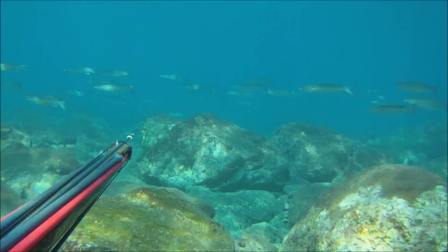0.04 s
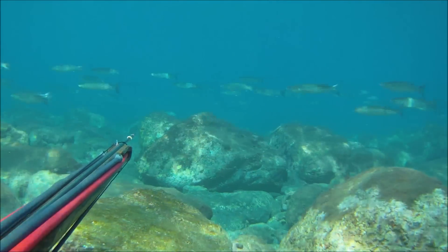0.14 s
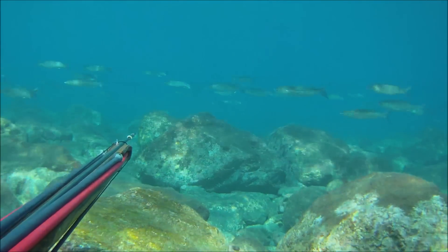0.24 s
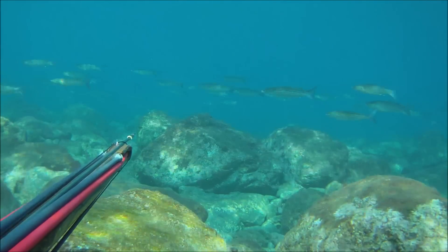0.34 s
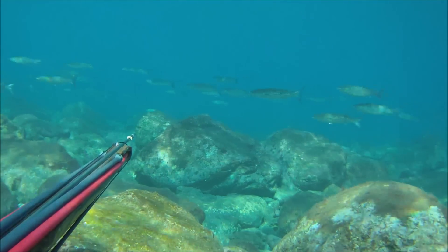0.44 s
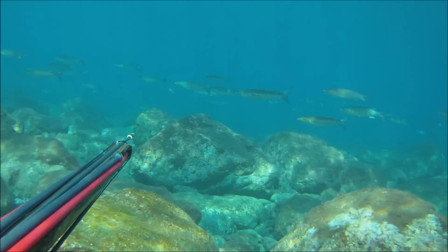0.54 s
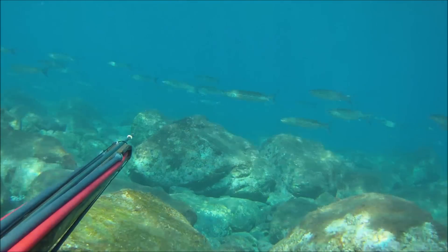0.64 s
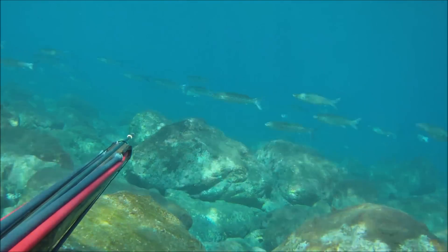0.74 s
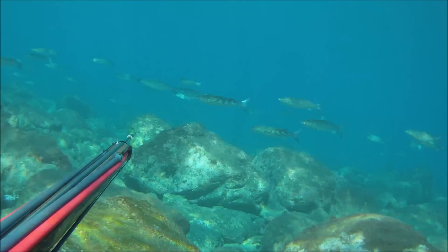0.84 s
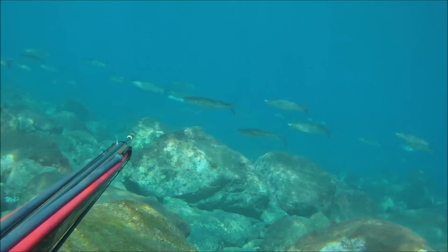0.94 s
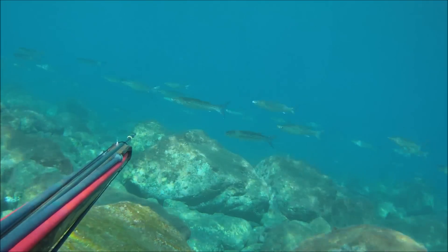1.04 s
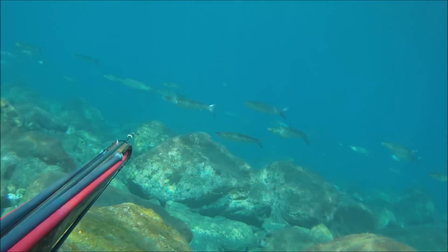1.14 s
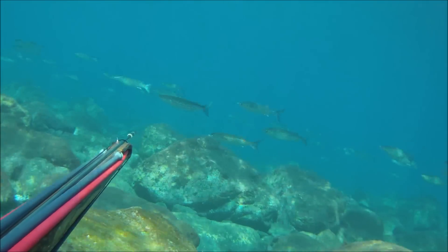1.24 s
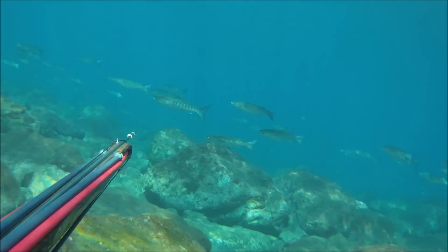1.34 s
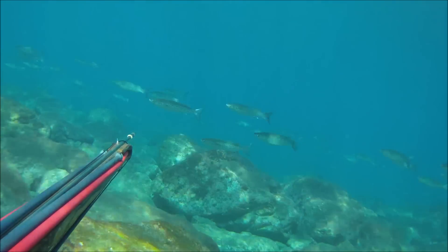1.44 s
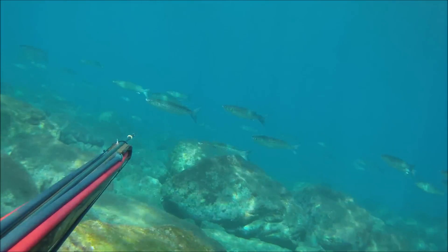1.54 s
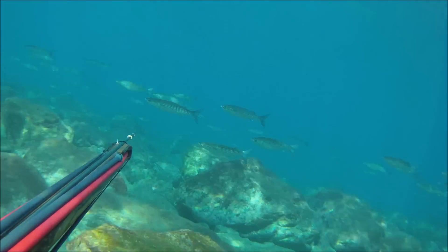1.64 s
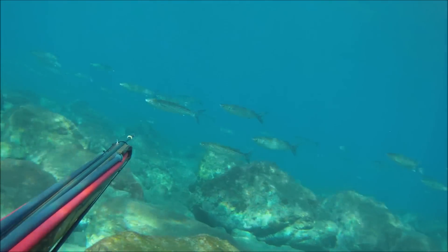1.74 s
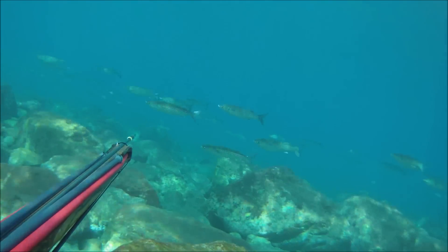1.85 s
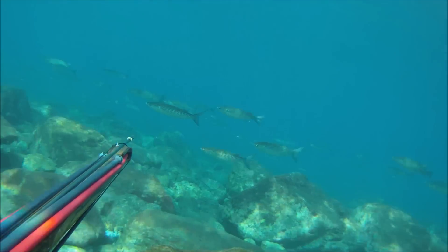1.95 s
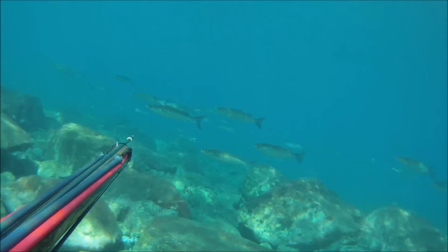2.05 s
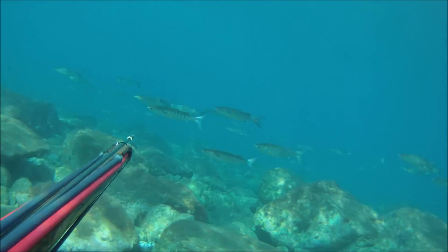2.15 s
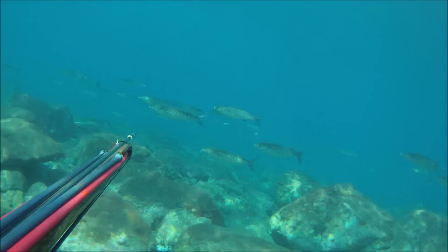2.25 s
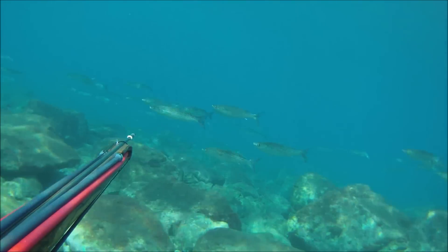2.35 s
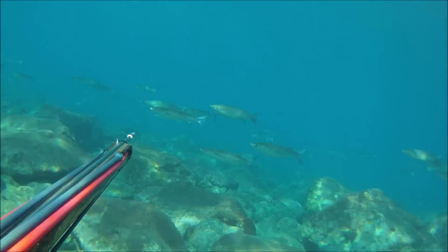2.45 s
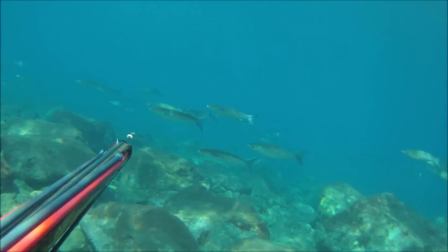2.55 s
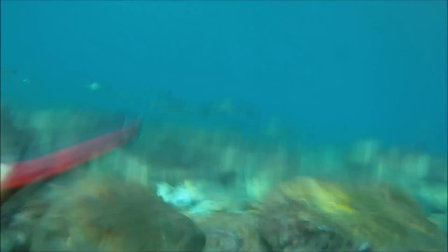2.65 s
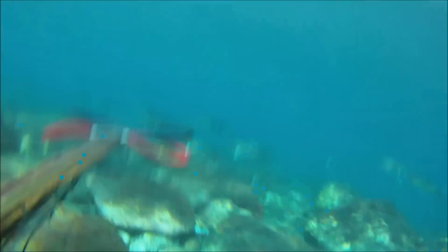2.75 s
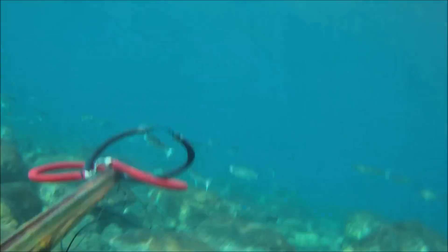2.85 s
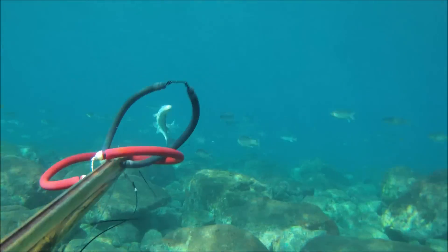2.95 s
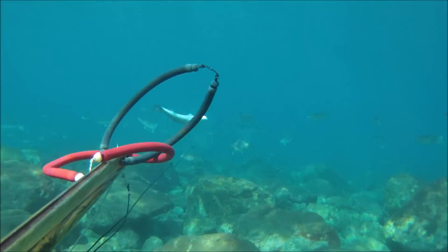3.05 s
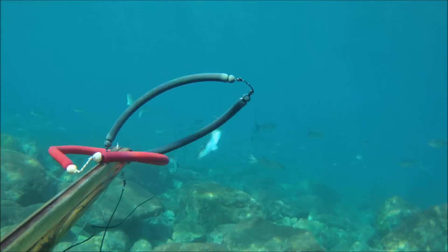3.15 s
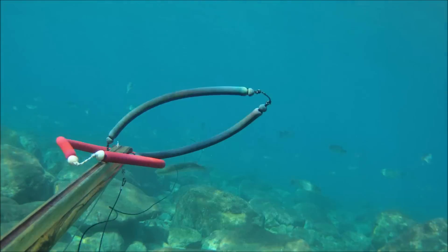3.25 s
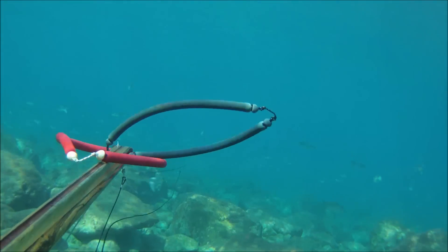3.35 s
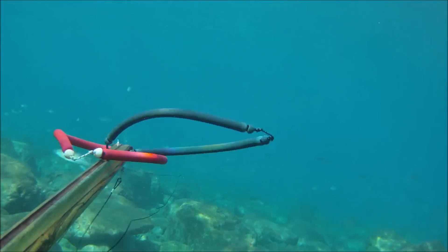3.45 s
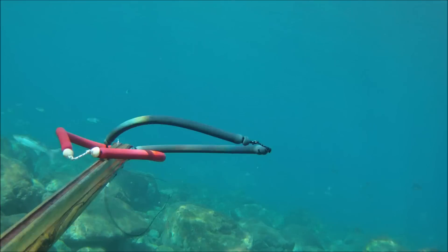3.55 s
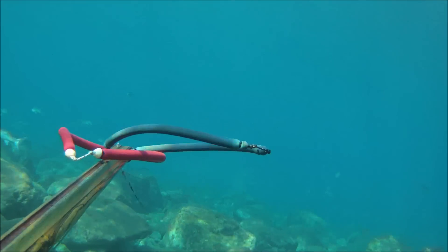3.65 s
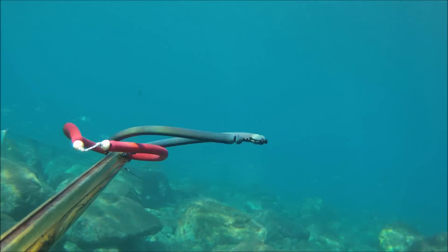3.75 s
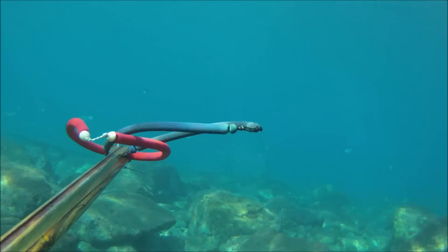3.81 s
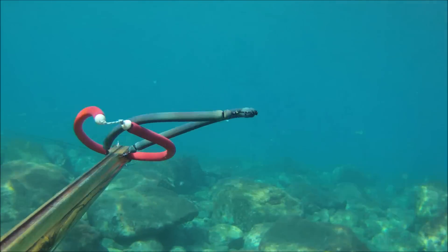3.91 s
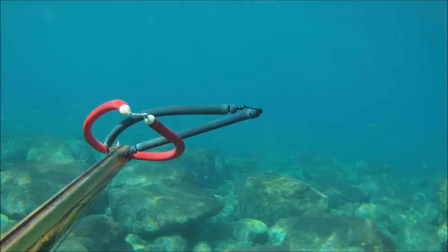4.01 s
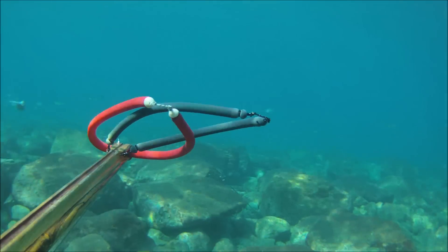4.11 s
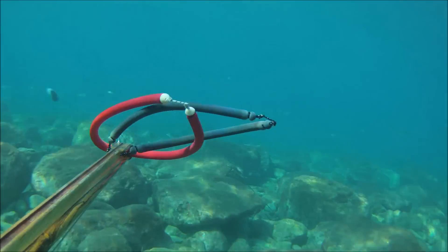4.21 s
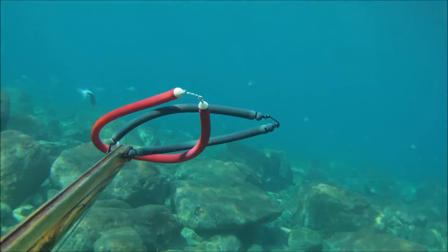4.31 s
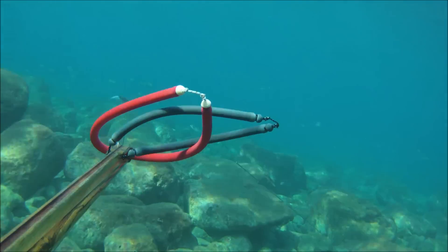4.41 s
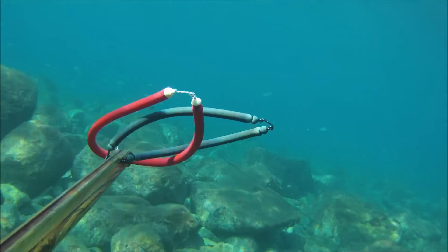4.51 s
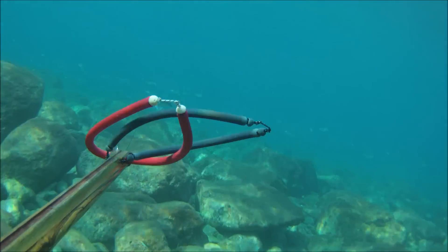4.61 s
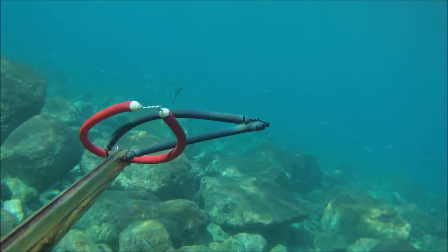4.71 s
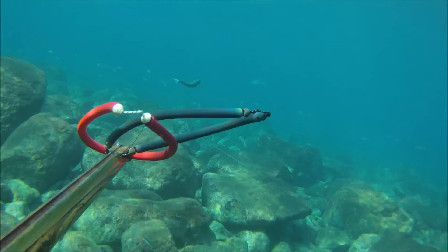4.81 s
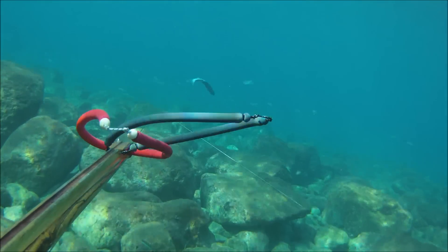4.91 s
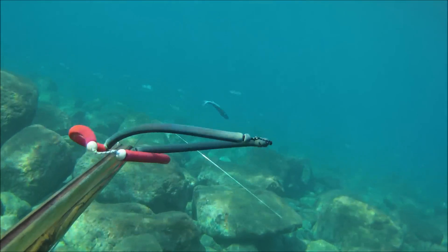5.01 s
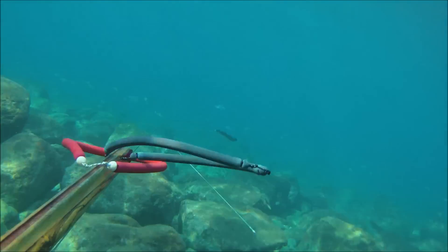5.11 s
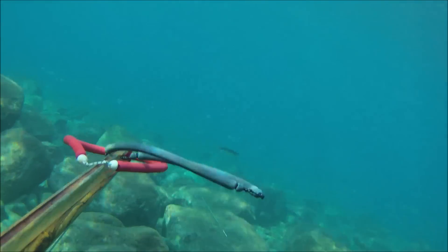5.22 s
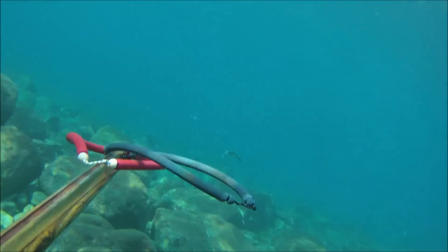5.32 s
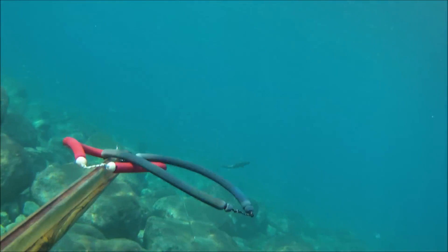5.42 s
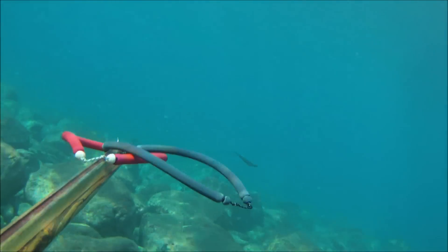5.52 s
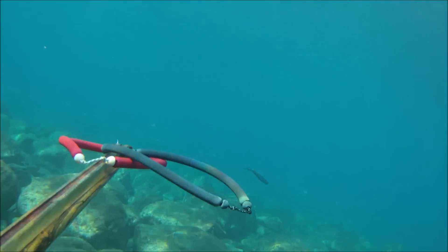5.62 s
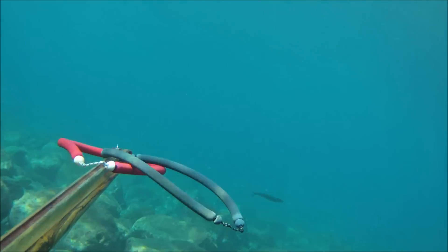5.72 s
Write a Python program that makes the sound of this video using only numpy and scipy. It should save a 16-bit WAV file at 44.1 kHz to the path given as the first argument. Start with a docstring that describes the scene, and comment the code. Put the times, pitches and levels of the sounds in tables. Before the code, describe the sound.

Near-silent underwater hiss and faint ticks, then a sudden violent metallic speargun crack and clatter, followed by quiet dull rubbing and knocks.

```python
"""Under water among rocks, inside a waterproof housing on a rubber-band speargun as it fires.
The latch and blows of the shot ring modes of gun and steel under bursts of clatter and crack; shaft and line
scrape in stick-slip clicks, bands flap in soft low bumps, and surging water is slow coloured noise.
Before the shot come faint rubs (clicks through housing resonances) and soft knocks in the modes of the stock;
after it, hand, line and slack rubber rub and knock more strongly.
Shrimp and tackle snap in short bands of noise over a steady hiss, low wash and far crackle."""
import sys
import numpy as np
from scipy import signal
from scipy.io import wavfile

SR = 44100
rng = np.random.default_rng(int(sys.argv[2]) if len(sys.argv) > 2 else 0)


def to_wav(sig):
    """Store sig (one row per channel, or 1-D mono) as 16-bit WAV at the path in sys.argv[1].

    Samples outside -1..1 are clipped; the rate is SR.
    """
    pcm = np.clip(np.atleast_2d(sig), -1, 1) * 32767
    pcm = np.round(pcm).astype(np.int16)
    wavfile.write(sys.argv[1], SR, pcm.T)  # frames by channels


N = 254456
TIME = np.arange(N) / SR
EDGE_HZ = 15700  # top of the band

# Blows of the shot. Each row: start in seconds, ring level in dB, centre of the ring in Hz,
# ring t60 in seconds, clatter level in dB, crack level in dB.
BLOWS = [(2.7733, -4, 1060, 0.0095, -10.5, -25), (2.7753, -1, 802.3, 0.022, -8, -14.5),
         (2.7784, -6, 1404, .012, -20, -29.5), (2.7849, -2, 518.6, 0.013, -16, -31.5),
         (2.7905, -3.5, 1640, 0.039, -13, -19.5), (2.7986, -10.5, 1650, .028, -20.5, -30),
         (2.801, -9, 640, .012, -21, -36.5), (2.8127, -21.5, 860, .015, -25, -42),
         (2.8228, -14, 427.2, 0.019, -34, -41), (2.829, -16, 620, 0.022, -17, -22),
         (2.839, -8, 1735, 0.035, -28, -30), (2.8442, -10.5, 625, 0.041, -26, -28),
         (2.8514, -11, 423, 0.04, -16.5, -31), (2.8513, -12, 1767, 0.056, -14.5, -29),
         (2.8781, -15, 644, .02, -15, -32), (2.8915, -15, 1450, 0.023, -28, -41),
         (2.896, -13, 520, .025, -32, -41), (2.929, 0, 767.5, 0.018, -13.5, -30),
         (2.932, -15.5, 414, 0.068, -32, -48.5), (2.9474, -24, 638, .03, -25.5, -40),
         (2.954, -19.5, 1386, 0.033, -28.5, -41), (2.972, -16, 622.5, 0.014, -31, -59.5),
         (2.9928, -25.5, 607, 0.021, -35.5, -63), (3.002, -26.5, 530, 0.043, -36, -69),
         (3.014, -30, 454, 0.053, -57, -66), (3.021, -30, 1780, 0.071, -34.5, -61)]
# Modes of the gun under a hard blow. Each row: frequency in Hz, relative level in dB.
GUN_MODES = [(420, -2.5), (520, -3.5), (610, 1.5), (960, -4), (1080, -2.5), (1275, -4.5), (1460, -0.5),
             (1635, 1), (1770, -4), (2000, -3.5), (2180, -3.5), (2330, -6.5), (3200, -3.5)]
# Spectrum of the gun's loose parts. Each row: frequency in Hz, relative level in dB per Hz.
CLATTER_SPECTRUM = [(40, -27.5), (150, -15.5), (260, -0.5), (340, -10.5), (500, -0.5), (800, -1.5),
                    (1100, 4.5), (1700, 4.5), (2400, -7.5), (3400, -9.5), (6000, -29.5), (10000, -34.5),
                    (16000, -49)]
# Spectrum of the bright cracks and the fizz. Each row: frequency in Hz, relative level in dB per Hz.
CRACK_SPECTRUM = [(500, -20), (1800, -3), (3000, -2), (4500, -0.5), (6300, -7.5), (8500, -13.5),
                  (10500, -14), (12500, -20), (16000, -22.5)]
# The latch letting go of the spear. Each row: start in seconds, level in dB, centre in Hz.
LATCH = [(2.7759, -3, 8730)]
# Steel clinking on steel. Each row: start in seconds, level in dB, centre in Hz.
CLINKS = [(2.7745, -9.5, 2320), (2.776, -10.5, 3330), (2.792, -15.5, 3220), (2.836, -27, 4700),
          (2.995, -57, 4170), (3.002, -52, 3580), (3.0198, -34.5, 3690)]
# Modes of the steel wishbones and fittings. Each row: frequency in Hz, relative level in dB.
STEEL_MODES = [(2330, -1.5), (3050, -4), (3350, 0), (3770, -3.5), (4180, -5), (4400, -4), (4900, -2.5)]
# The spear and its line running out. Each row: time in seconds, scrape level in dB, water surge level in dB.
FLIGHT = [(2.745, -82.5, -85), (2.769, -61, -67.5), (2.777, -33, -33.5), (2.815, -33, -34),
          (2.845, -23.5, -34.5), (2.89, -31, -28), (2.97, -41, -44.5), (3.03, -40.5, -40),
          (3.055, -59, -52), (3.3, -86, -92)]
# Resonances of shaft and muzzle under scraping. Each row: frequency in Hz, width in Hz, relative level in dB.
SHAFT_RESONANCES = [(380, 27, 0), (540, 60, -7.5), (604, 72, 15.5), (730, 49, -12), (910, 33, -8.5),
                    (1270, 58, -13), (1390, 60, -1), (1520, 54, -6), (1880, 38, -7.5), (3128, 280, -26),
                    (3750, 260, -20), (5100, 1200, -26.5)]
# Spectrum of the surging water. Each row: frequency in Hz, relative level in dB per Hz.
SURGE_SPECTRUM = [(8, -31), (22, -4), (35, -3.5), (55, -3), (85, 1), (125, -9), (165, -8.5), (260, -11),
                  (400, -36), (900, -82.5)]
# Loose bands slapping the water. Each row: start in seconds, level in dB, centre in Hz,
# time constant of the rise in seconds.
FLAPS = [(2.774, -20, 263.8, 0.0025), (2.832, -24.5, 154, 0.0043), (2.874, -35.5, 88.3, 0.0072),
         (2.905, -27.5, 88, 0.0051), (2.998, -32, 75.6, 0.0044)]
# Modes of the loose bands in the water. Each row: frequency in Hz, relative level in dB.
BAND_MODES = [(84, -1.5), (163, -1), (270, 2)]
# The hand's hold, light while aiming and firm after the shot. Each row: time in seconds,
# pressure level in dB, flexing level in dB.
HOLD = [(0, -84, -106), (1.0, -83, -96), (1.3, -78.5, -80.5), (2.15, -76, -82), (2.62, -80.5, -84.5),
        (3.06, -59.5, -57), (3.2, -66.5, -64.5), (3.48, -66.5, -68), (3.79, -73, -89.5), (3.82, -58, -65.5),
        (4.25, -61, -62.5), (4.57, -65.5, -67), (4.84, -67, -65), (4.95, -54.5, -69.5), (5.19, -58, -66.5),
        (5.4, -54, -61.5), (5.77, -63.5, -63)]
# Strokes of hand, line and rubber along the stock. Each row: start in seconds, length in seconds,
# groan level in dB, rasp level in dB, flexing level in dB.
STROKES = [(3.122, 0.045, -74, -67.5, -66), (3.225, 0.027, -57.5, -65, -54.5),
           (3.585, 0.039, -97.5, -65.5, -91.5), (3.953, 0.068, -54, -72, -65),
           (4.061, 0.17, -52.5, -64, -72.5), (4.62, 0.06, -53, -69.5, -67), (4.726, .055, -52, -58, -57.5),
           (4.842, 0.069, -49, -58, -69.5), (4.913, 0.038, -65, -73, -53),
           (4.992, 0.048, -50.5, -56, -60.5), (5.055, 0.035, -48.5, -73.5, -55),
           (5.22, 0.08, -48.5, -62.5, -58.5), (5.309, 0.029, -47.5, -61, -53.5),
           (5.413, 0.083, -52.5, -61, -66), (5.525, 0.094, -50.5, -59, -57)]
# Resonances of the housing under the grip. Each row: frequency in Hz, width in Hz, relative level in dB.
BODY_RESONANCES = [(346.7, 11, 0), (439, 120, 1), (599.4, 39, 8.5), (680, 22, -16.5), (890, 150, -16)]
# Resonances of the housing under the rasp. Each row: frequency in Hz, width in Hz, relative level in dB.
SHELL_RESONANCES = [(927, 28.2, -1), (1200, 110, 0), (1460, 150, -2.5), (1692, 20, 2.5), (1829, 22, -20),
                    (3220, 300, -14), (4164, 330, -17), (4840, 140, -12)]
# Spectrum of the low flexing. Each row: frequency in Hz, relative level in dB per Hz.
FLEX_SPECTRUM = [(8, -25), (20, -1.5), (35, -1.5), (62, -17.5), (88, 0), (120, -15.5), (160, -0.5),
                 (210, -9.5), (280, -5.5), (400, -33), (900, -74.5)]
# Knocks on the stock. Each row: start in seconds, level in dB, centre in Hz,
# time constant of the rise in seconds.
KNOCKS = [(.052, -66, 880, 0.0024), (.129, -57.5, 764, 0.00067), (.532, -54.5, 750, 0.0022),
          (1.29, -60.5, 570, 0.0084), (1.372, -63.5, 415, 0.0026), (1.648, -60.5, 605, 0.007),
          (1.885, -49.5, 620, 0.0024), (2.012, -60, 600, .006), (2.3965, -54.5, 710, 0.0014),
          (2.745, -51.5, 536, .007), (3.134, -53.5, 1210, 0.0021), (3.296, -51, 590, 0.00058),
          (3.343, -57.5, 166.1, .004), (3.706, -56.5, 587, 0.0021), (3.81, -50.5, 290, 0.0085),
          (3.874, -48.5, 600, 0.0012), (3.89, -44.5, 318.6, 0.011), (3.957, -48.5, 570, 0.0031),
          (3.975, -48.5, 341, 0.0074), (4.106, -44, 488, 0.0015), (4.139, -36, 441, 0.00063),
          (4.224, -42.5, 606, 0.0049), (4.312, -45, 664, .002), (4.335, -50, 300, 0.0058),
          (4.367, -47, 590, 0.0021), (4.452, -53, 430.6, 0.012), (4.659, -42.5, 590, 0.0013),
          (4.746, -41.5, 600, 0.0026), (4.773, -42, 513, 0.0016), (4.862, -42.5, 584, 0.0021),
          (4.888, -34.5, 604, 0.0089), (4.928, -44.5, 378, 0.0021), (4.945, -48.5, 165, 0.0091),
          (5.004, -46, 580, 0.0021), (5.019, -36, 570, 0.0052), (5.067, -45.5, 560.6, 0.0015),
          (5.233, -45.5, 581, 0.0062), (5.258, -43.5, 598, 0.0038), (5.278, -45.5, 478, 0.0036),
          (5.338, -40, 600, 0.0033), (5.461, -52.5, 596, 0.002), (5.548, -48.5, 1190, 0.004),
          (5.593, -46.5, 1220, 0.0038), (5.631, -38.5, 600, 0.0034)]
# Modes of the stock under a soft knock. Each row: frequency in Hz, relative level in dB.
STOCK_MODES = [(165, 0.5), (325, 4.5), (435, -0.5), (598, -0.5), (890, -3), (1200, -2.5)]
# Sharp snaps of shrimp and tackle. Each row: start in seconds, level in dB, centre in Hz.
SNAPS = [(.18, -68.5, 4970), (.5776, -69, 5000), (.9278, -64.5, 2570), (1.2126, -68, 4340),
         (1.6126, -61.5, 4130), (1.615, -62, 1860), (1.885, -65.5, 1700), (1.914, -63.5, 3540),
         (2.0793, -65.5, 2220), (2.123, -68, 2020), (2.152, -68, 2070), (3.09, -68, 3700),
         (3.16, -65, 3500), (3.605, -65, 2370), (4.004, -63.5, 4900), (4.128, -58, 6600),
         (4.13, -58.5, 2370)]
# Spectrum of the open water. Each row: frequency in Hz, relative level in dB per Hz.
WATER_SPECTRUM = [(12, -26), (20, 5), (42, -0.5), (76, -16), (153, -14.5), (289, -14.5), (404, -9.5),
                  (491, -10.5), (597, 0.5), (746, -18), (906, -6.5), (1130, -15), (1630, -16), (12100, -23),
                  (15500, -23)]


def shot(rise_s=0.00041, reach_octaves=0.28, clatter_t60=0.025, crack_t60=0.022,
         crack_width=.14, clatter_width=.05):
    """Each blow rings the gun, shakes its loose parts and starts with a bright crack."""
    t = np.arange(SR // 8) / SR
    mid, side = np.zeros((2, N))
    attack = 1 - np.exp(-t / rise_s)
    for s, ring_db, hz, t60, clatter_db, crack_db in BLOWS:
        tone = amp(ring_db) * struck(t, GUN_MODES, hz, reach_octaves) * decay(t, t60) * attack
        clatter, other_clatter = (burst(t, clatter_db, clatter_t60, CLATTER_SPECTRUM) for _ in range(2))
        crack, other_crack = (burst(t, crack_db, crack_t60, CRACK_SPECTRUM) for _ in range(2))
        add(mid, s, tone + clatter + crack)
        # mostly treble differs between the ports
        add(side, s, crack_width * other_crack + clatter_width * other_clatter)
    return two_ports(mid, side)


def latch(side_db=-15, t60=0.0035):
    """The trigger's hard metal click, a dying fizz slightly different at each port."""
    mid = snaps(LATCH, spread=.22, t60=t60)
    side = amp(side_db) * snaps(LATCH, spread=.45, t60=t60)
    return two_ports(mid, side)


def clinks(t60=0.024, reach_octaves=0.2):
    """Short, high rings of steel, damped by the water."""
    t, out = np.arange(SR // 10) / SR, np.zeros(N)
    for s, db, hz in CLINKS:
        add(out, s, amp(db) * struck(t, STEEL_MODES, hz, reach_octaves) * decay(t, t60))
    return out


def flight(edge_hz=6000, side_db=-24, fizz_db=-17, fizz_end_s=2.96, fizz_t60=.04):
    """The shaft and line scrape and fizz through the muzzle while the flapping bands push water at the housing."""
    scrape, surge = levels(FLIGHT)
    rung = ring(slips(per_s=2200, spread_db=7, smooth=0.19), SHAFT_RESONANCES)
    steel = scrape * unit(soften(rung, edge_hz, order=4))
    fizz = amp(fizz_db) * scrape * colour(slips(per_s=540, spread_db=4.5, smooth=0.21), CRACK_SPECTRUM)
    fizz = fizz * decay(np.maximum(TIME - fizz_end_s, 0), fizz_t60)  # it dies once the spear has gone
    side = amp(side_db) * scrape * colour(rng.standard_normal(N), CRACK_SPECTRUM)
    eddies = signal.hilbert(colour(rng.standard_normal(N), SURGE_SPECTRUM))
    # uneven in pace, nearly even in strength
    sway = unit(soften(eddies.real / (abs(eddies) + .5), edge_hz=400, order=4))
    return two_ports(steel, side) + fizz + surge * sway


def flaps():
    """Loose bands slap the water: soft bumps in the low modes of the rubber."""
    return bumps(FLAPS, BAND_MODES, reach_octaves=0.16, shortest_t60=.06, t60_per_rise=6.6,
                 grain_db=-12.5, grain_width=1.0)


def rubbing(held_rasp_db=-13, hiss_db=-17):
    """Slips of hand and rubber ring the housing: a dull groan, a rasp and hiss above it, a low flexing below."""
    pressure, flexing = levels(HOLD)
    pressure = pressure * waver(depth_db=3.0, rate_hz=13)  # the hand is never quite still
    push, rasp, bend = strokes()

    grip = ring(slips(per_s=220, spread_db=3.0, smooth=0.75), BODY_RESONANCES)
    groan = unit(soften(grip, edge_hz=680, order=4))
    scratch = ring(slips(per_s=400, spread_db=3, smooth=.2), SHELL_RESONANCES)
    grit = unit(soften(scratch, edge_hz=2900))
    hiss = unit(soften(resonate(rng.standard_normal(N), hz=4300, width_hz=600), edge_hz=6300, order=4))
    flex = colour(slips(per_s=250, spread_db=0.5, smooth=0.26), FLEX_SPECTRUM)

    # hold and strokes add as powers
    groan_gain = np.hypot(pressure, push)
    flex_gain = np.hypot(flexing, bend)
    rasp_gain = np.hypot(amp(held_rasp_db) * pressure, rasp)
    return groan_gain * groan + flex_gain * flex + rasp_gain * (grit + amp(hiss_db) * hiss)


def strokes(attack_s=0.017, release_t60=0.052):
    """Strength of groan, rasp and flexing: every stroke swells, holds and lets go alike."""
    out = np.zeros((3, N))
    for start, length, *db in STROKES:
        attack = np.clip((TIME - start) / attack_s, 0, 1)
        release = decay(np.maximum(TIME - start - length, 0), release_t60)
        out += amp(db)[:, None] * attack * release
    return out


def knocks():
    """Knocks on the stock: soft, grainy bumps in its modes."""
    return bumps(KNOCKS, STOCK_MODES, reach_octaves=0.3, shortest_t60=.034, t60_per_rise=8.5,
                 grain_db=-10, grain_width=.9)


def snaps(table, spread, t60):
    """Bright ticks, each a short fizz in a band around one pitch."""
    t, out = np.arange(SR // 5) / SR, np.zeros(N)
    shape = decay(t, t60)
    for s, db, hz in table:
        edges = [hz / (1 + spread), min(hz * (1 + spread), EDGE_HZ)]
        band = signal.butter(3, edges, "band", fs=SR, output="sos")
        fizz = signal.sosfilt(band, shape * rng.choice([-1., 1.], len(t)))
        add(out, s, amp(db) * fizz * np.linalg.norm(shape) / np.linalg.norm(fizz))
    return out


def water(level_db=-69.5, side_db=-22, crackle_db=-82, crackle_t60=0.023):
    """Even hiss and low wash as coloured noise, with far shrimp as random clicks smeared by dying noise."""
    mid, side = (amp(level_db) * colour(rng.standard_normal(N), WATER_SPECTRUM) for _ in range(2))
    side = side - soften(side, edge_hz=900, order=1)  # the bass is nearly the same at both ports
    t = np.arange(SR // 10) / SR
    smear = rng.standard_normal(len(t)) * decay(t, crackle_t60)
    far = signal.oaconvolve(slips(per_s=70, spread_db=2, smooth=0), smear)[:N]
    crackle = unit(soften(resonate(far, hz=3470, width_hz=6200), edge_hz=2800, order=4))
    return two_ports(mid + amp(crackle_db) * crackle, amp(side_db) * side)


def bumps(table, modes, reach_octaves, shortest_t60, t60_per_rise, grain_db, grain_width):
    """Soft bumps swell and die in a body's modes, with a rough edge; the slower the rise, the longer the ring."""
    t, out = np.arange(SR // 4) / SR, np.zeros(N)
    for s, db, hz, rise_s in table:
        shape = (1 - np.exp(-t / rise_s)) ** 2 * decay(t, shortest_t60 + t60_per_rise * rise_s)
        shape = shape / shape.max()
        tone = shape * struck(t, modes, hz, reach_octaves)
        rough = resonate(rng.standard_normal(len(t)), hz, grain_width * hz)
        grain = shape * soften(rough, edge_hz=1.2 * hz, order=4)
        add(out, s, amp(db) * (tone + amp(grain_db) * np.std(tone) * unit(grain)))
    return out


def struck(t, modes, centre_hz, reach_octaves, detune=0.0066):
    """The modes of a struck body sounding together; where it is hit favours those near one pitch."""
    hz, db = np.transpose(modes)
    weight = amp(db) / (1 + (np.log2(hz / centre_hz) / reach_octaves) ** 4)
    detuned_hz = hz * (1 + detune * rng.standard_normal(len(hz)))
    tones = np.sin(2 * np.pi * np.outer(detuned_hz, t))
    return -(weight / np.linalg.norm(weight)) @ tones


def burst(t, db, t60, spectrum):
    """A dying puff of coloured noise whose energy is set by its level and length."""
    shape = decay(t, t60)
    puff = colour(shape * rng.choice([-1., 1.], len(t)), spectrum, size=2048)
    return amp(db) * puff * np.linalg.norm(shape) / np.linalg.norm(puff)


def slips(per_s, spread_db, smooth):
    """Stick-slip friction: random clicks of uneven size over an even hiss of strength smooth, at rms 1."""
    size = amp(spread_db * np.minimum(rng.exponential(1, N), 3)) * rng.choice([-1, 1], N)
    clicks = size * (rng.random(N) < per_s / SR)
    return unit(unit(clicks) + smooth * rng.standard_normal(N))


def ring(x, modes):
    """A body of several resonances, at rms 1."""
    return unit(sum(amp(db) * resonate(x, hz, width) for hz, width, db in modes))


def resonate(x, hz, width_hz):
    """One resonance of gain 1 at its peak."""
    return signal.lfilter(*signal.iirpeak(min(hz, SR / 3), max(hz / width_hz, .5), fs=SR), x)


def colour(x, spectrum, size=4096):
    """Causal minimum-phase filter of energy 1 with the given spectrum."""
    hz, db = np.transpose(spectrum)
    bins_hz = abs(np.fft.fftfreq(size, 1 / SR))
    log_gain = np.log(amp(np.interp(np.log(bins_hz + 1), np.log(hz), db)))
    taps = np.fft.ifft(np.exp(np.conj(signal.hilbert(log_gain)))).real[:size // 2]
    return signal.oaconvolve(x, taps / np.linalg.norm(taps))[:len(x)]


def soften(x, edge_hz, order=2):
    """Low-pass: takes the treble off above the edge."""
    return signal.sosfilt(signal.butter(order, min(edge_hz, SR / 3), fs=SR, output="sos"), x)


def waver(depth_db, rate_hz):
    """A gain that wanders by chance, no faster than about rate_hz."""
    return amp(depth_db * unit(soften(rng.standard_normal(N), rate_hz)))


def decay(t, t60):
    """Falls 60 dB in t60 seconds."""
    return np.exp(-np.log(1000) * t / t60)


def levels(table):
    """The dB columns of a curve as gains, next to nothing (-140 dB) outside its span."""
    s, *columns = np.transpose(table)
    return [amp(np.interp(TIME, s, c, left=-140, right=-140)) for c in columns]


def amp(db):
    """Decibels to gain."""
    return 10 ** (np.asarray(db) / 20)


def unit(x):
    """Scales to rms 1."""
    return x / np.sqrt(np.mean(x ** 2) + 1e-20)


def add(mix, s, sound):
    """Mixes a sound in at time s in seconds."""
    part = mix[round(s * SR):][:len(sound)]
    part += sound[:len(part)]


def two_ports(mid, side):
    """Shared sound plus and minus the difference gives the two ports."""
    return np.array([mid + side, mid - side])


def scene():
    """Everything reaches both ports through the one housing, so it is nearly mono."""
    gun = shot() + latch() + clinks() + flight() + flaps()
    handling = rubbing() + knocks()
    return gun + handling + snaps(SNAPS, spread=0.58, t60=0.098) + water()


def record(dry):
    """The input blocks slow drift and clips the loudest peaks; then the band limit."""
    steady = signal.sosfilt(signal.butter(2, 9, "high", fs=SR, output="sos"), dry)
    clipped = np.clip(steady, -.93, .93)
    band_limit = signal.firwin(255, EDGE_HZ, window=("kaiser", 8), fs=SR)
    return signal.oaconvolve(clipped, band_limit[None], "same")


dry = scene()
out = record(dry)
to_wav(out)
```